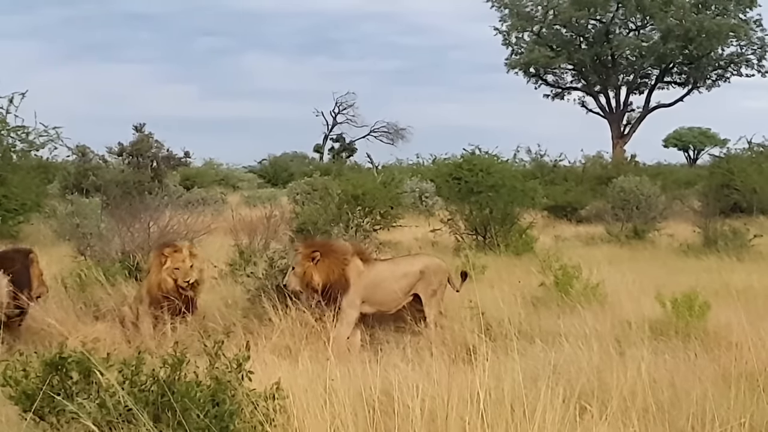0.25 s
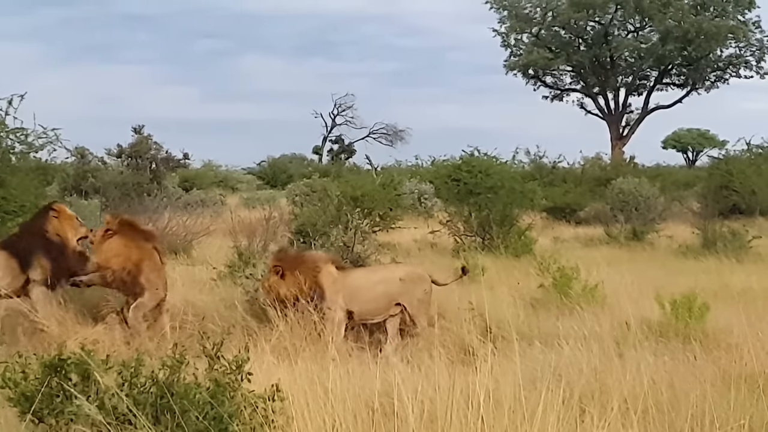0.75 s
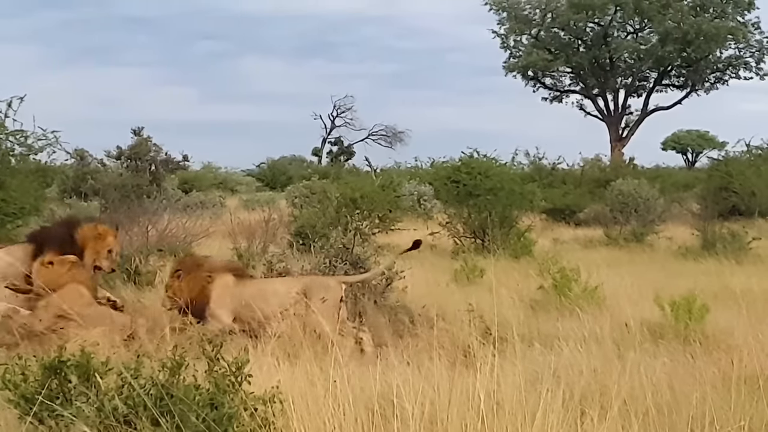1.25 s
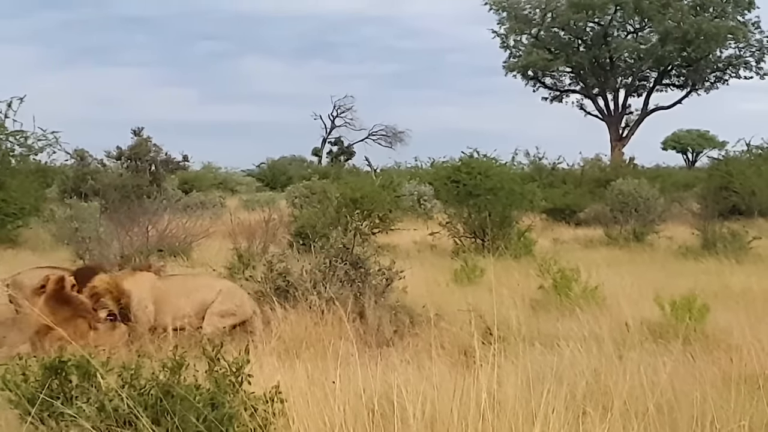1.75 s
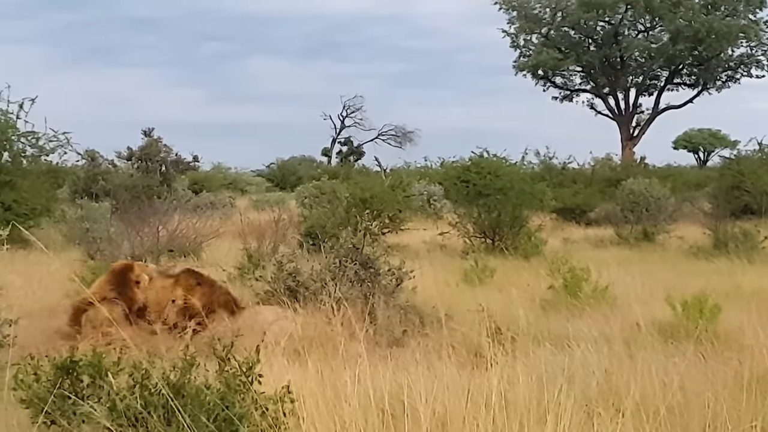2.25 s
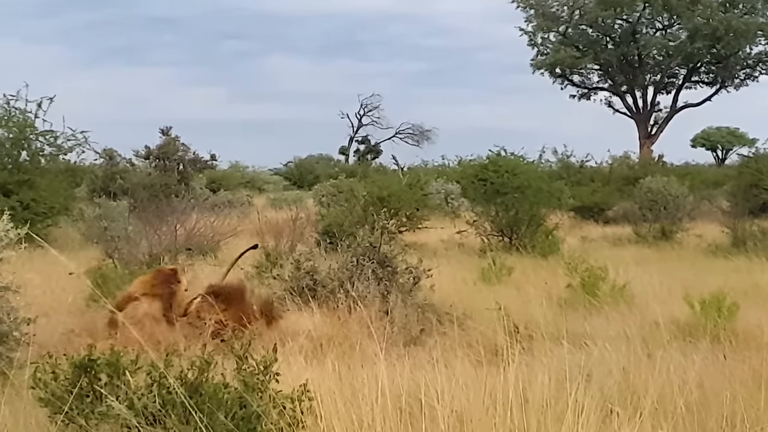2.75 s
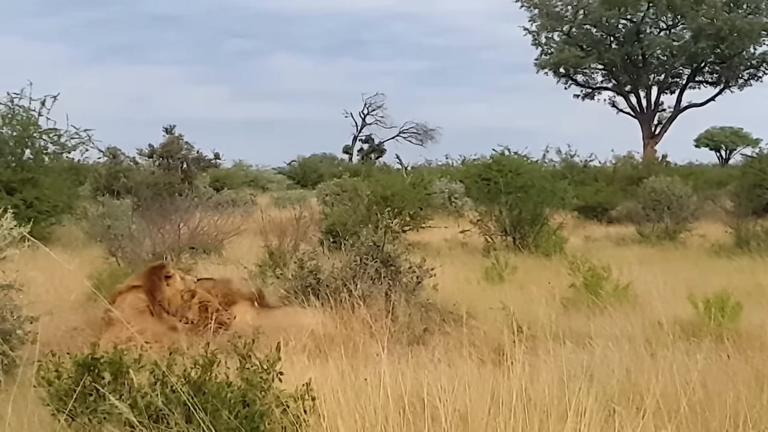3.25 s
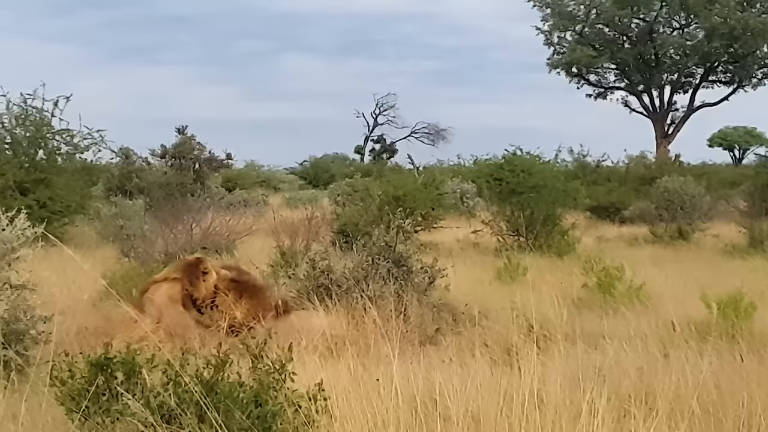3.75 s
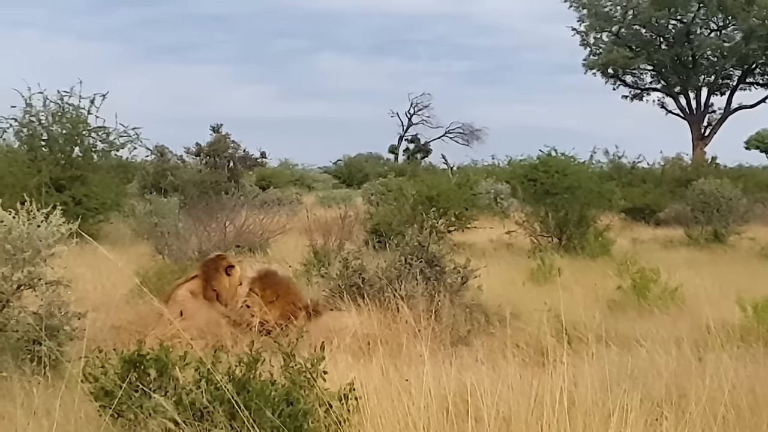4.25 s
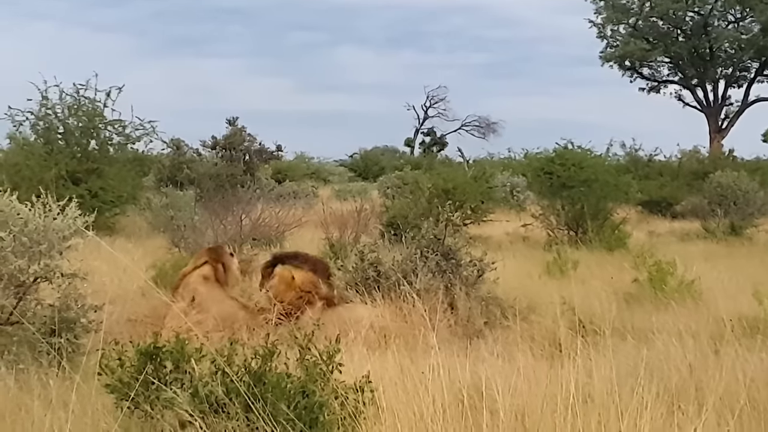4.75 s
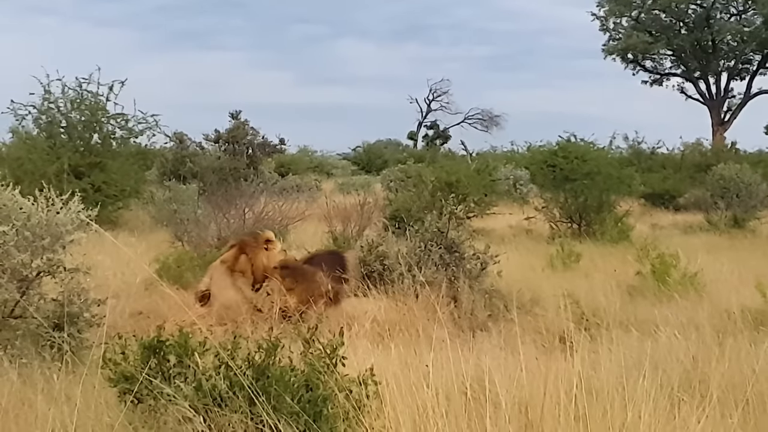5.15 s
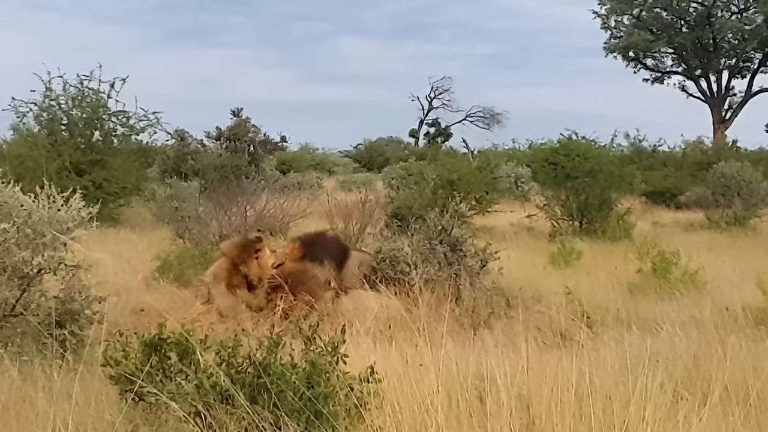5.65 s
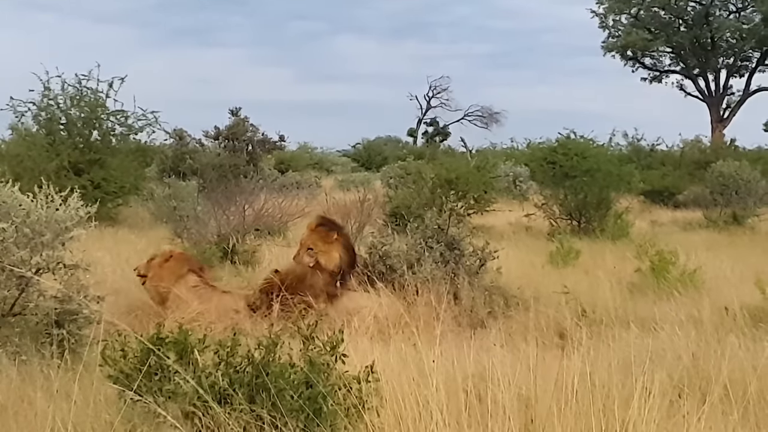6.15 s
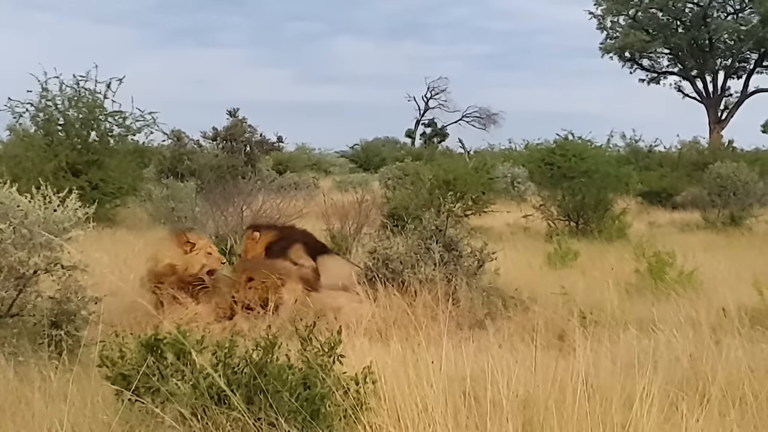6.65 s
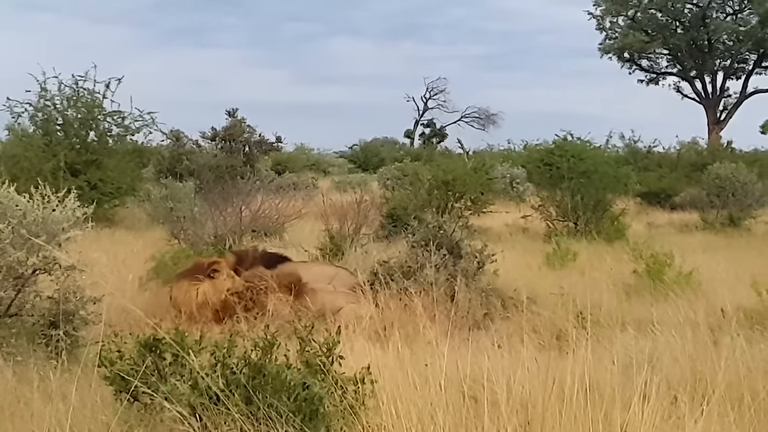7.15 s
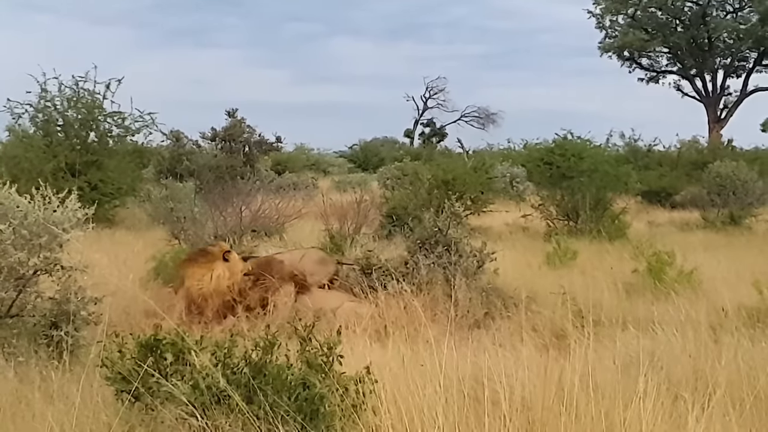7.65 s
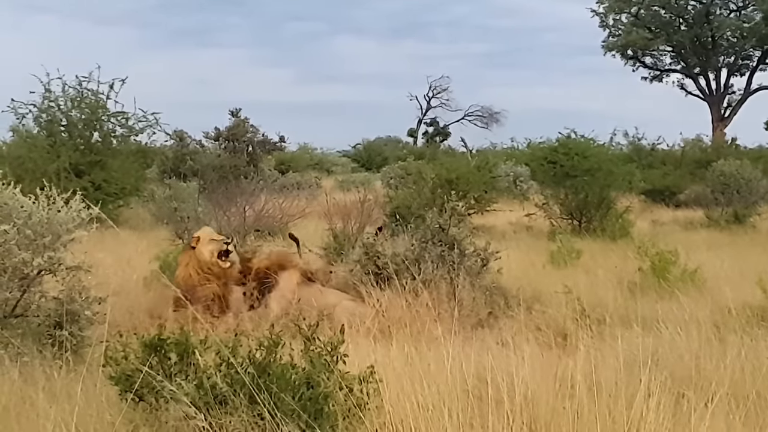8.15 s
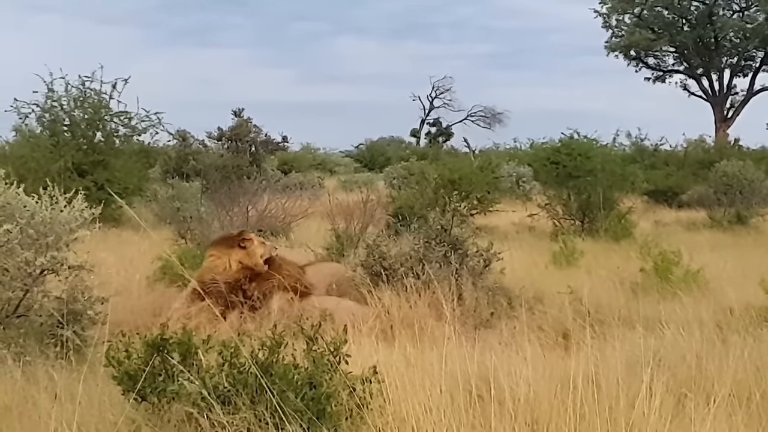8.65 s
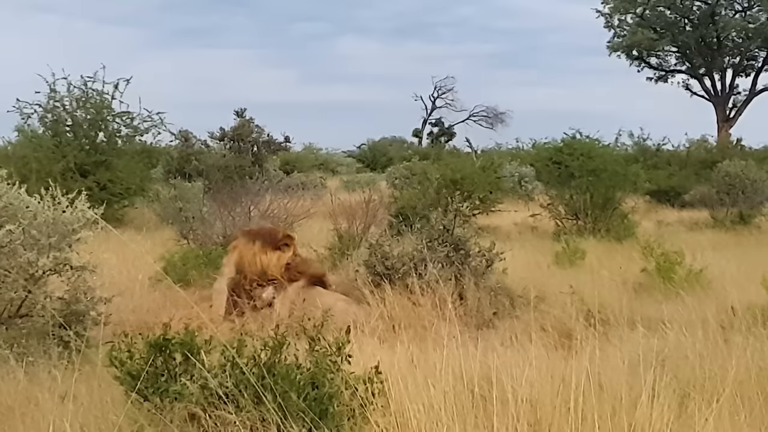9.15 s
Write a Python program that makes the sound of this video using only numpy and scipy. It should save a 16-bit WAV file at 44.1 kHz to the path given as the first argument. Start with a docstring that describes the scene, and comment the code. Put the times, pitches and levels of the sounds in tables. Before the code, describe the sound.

Male lions fight in dry savanna grass, rough throaty growls and roars following one another almost without pause, with rustling grass and light wind rumble.

```python
"""Male lions fight in dry savanna grass: two faint growls, then loud ones with a rival and snarls over the teeth.
From 1.4 s growl follows growl, with sweeping wails and booming moans; about 6.1-6.7 s the voices sink, then swell.
Slack folds slap 24-50 times a second into a long throat of gliding resonances; a rival's faster folds join in.
Throughout, noise grains crackle as thrashed grass, a few stalks crack, and shaped noise rumbles as light wind."""
import sys
import numpy as np
from scipy import signal
from scipy.fft import rfft, irfft, next_fast_len
from scipy.io import wavfile
from scipy.ndimage import uniform_filter1d, map_coordinates

SR = 44100
rng = np.random.default_rng(int(sys.argv[2]) if len(sys.argv) > 2 else 0)


def pcm_store(signal):
    """Save signal as 16-bit PCM."""
    levels = np.round(np.clip(np.atleast_2d(signal), -1, 1) * 32767)
    wavfile.write(sys.argv[1], SR, levels.astype(np.int16).T)


N = 414540
TIME = np.arange(N) / SR
SIZE = 3072  # samples in one slap

# one growl a row: start_s, length_s, slap rate at its start_hz, middle_hz, end_hz
GROWL_TIMING = [(0.015, 0.135, 28.6, 25.7, 24.7), (0.165, 0.165, 23.5, 27.4, 28.8),
                (0.388, 0.332, 29.0, 38.0, 46.2), (0.726, 0.204, 48.8, 46.1, 48.0),
                (0.942, 0.208, 48.2, 50.1, 48.2), (1.159, 0.221, 46.0, 42.6, 41.8),
                (1.389, 0.251, 40.8, 43.5, 36.0), (1.663, 0.357, 43.9, 39.6, 38.5),
                (2.044, 0.456, 39.2, 33.6, 30.6), (2.512, 0.378, 34.2, 31.2, 29.7),
                (3.062, 0.538, 33.2, 35.8, 28.6), (3.629, 0.451, 32.5, 33.8, 29.1),
                (4.099, 0.211, 25.4, 33.1, 26.5), (4.331, 0.48, 37.0, 36.7, 35.9),
                (4.827, 0.243, 36.7, 39.7, 32.8), (5.098, 0.352, 38.7, 44.6, 46.8),
                (5.472, 0.268, 41.6, 44.4, 37.7), (5.785, 0.345, 42.4, 42.2, 29.0),
                (6.139, 0.191, 29.9, 29.4, 28.1), (6.372, 0.128, 29.5, 30.5, 31.5),
                (6.507, 0.162, 31.5, 33.0, 32.0), (6.679, 0.361, 34.8, 36.3, 42.8),
                (7.053, 0.13, 37.0, 36.5, 35.0), (7.192, 0.45, 32.5, 38.8, 34.0),
                (7.663, 0.225, 34.5, 33.5, 32.5), (7.903, 0.46, 31.3, 29.8, 26.5),
                (8.386, 0.065, 42.0, 45.0, 45.0), (8.467, 0.2, 31.5, 32.0, 34.0),
                (8.68, 0.299, 39.0, 44.7, 36.5), (8.995, 0.155, 40.7, 30.4, 31.3),
                (9.174, 0.246, 36.4, 37.1, 36.5)]
# left-right likeness of turbulence and echo: frequency_hz, likeness (-1 to 1)
LION_LIKENESS = [(60, 0.87), (700, 1), (1200, 1), (2200, 1), (4000, 0.67), (15000, 0)]


def growl():
    """The leading lion: slow, nearly even fold slaps whose rate glides within each growl."""
    trains = []
    for start, length, first, middle, last in GROWL_TIMING:
        knots_s = [start, start + length / 2, start + length]
        trains.append(beats(np.interp(TIME, knots_s, [first, middle, last], left=0, right=0)))
    times, rate = np.hstack(trains)
    pose = posture(times)
    jitter_s = .002 * pose["rough"] * rng.standard_normal(len(times)).clip(-2, 2)
    times = times + jitter_s
    gain = barks(times) * np.sqrt((1 - pose["share"]) * SR / rate)
    closing_s = .0008  # the folds take this long to snap shut
    return amp(-0.05) * slaps(times + closing_s, gain, 0.66 * pose["rough"], puff_s=0.0036, scatter_db=0.87)


def rival():
    """A second lion: faster, unsteady folds, heard by its share of each growl and of the grumble between."""
    times, rate = beats(98 * np.exp(.04 * wobble(60) + .13 * wobble(5)))
    pose = posture(times)
    gain = barks(times) * np.sqrt(pose["share"] * SR / rate)
    return slaps(times, gain, pose["rough"] ** 1.08, puff_s=0.0033, scatter_db=2.5)


def slaps(times, gain, rough, puff_s, scatter_db):
    """Each closing of the folds is a clean slap plus a puff of turbulence, both through the tract."""
    hz, t = np.fft.rfftfreq(SIZE, 1 / SR), np.arange(SIZE) / SR
    draws = rng.standard_normal((len(times), 2 * SIZE + 1))
    fade = np.exp(-t / puff_s)
    fade /= np.linalg.norm(fade)
    noise = draws[:, 1:].reshape(-1, 2, SIZE).swapaxes(0, 1)
    puff = spread(rfft(noise * fade), hz, LION_LIKENESS)
    # turbulence grows with frequency, from lower down in a rough voice
    breathy_hz = 2700 * np.exp(-2 * rough[:, None])
    noisy = np.clip(rough[:, None] + 3.76 * hz ** 3 / (hz ** 3 + breathy_hz ** 3), 0, .98)
    sound = irfft(tract(times, hz) * (np.sqrt(1 - noisy) + np.sqrt(noisy) * puff))
    lead = SIZE // 32
    window = signal.windows.tukey(SIZE, 2 * lead / SIZE)  # smooth start and end
    sound = np.roll(sound, lead, axis=-1) * window
    sound *= (gain * amp(scatter_db * draws[:, 0]))[:, None]
    at = (np.round(times * SR).astype(int)[:, None] + np.arange(SIZE)).ravel()
    return np.array([np.bincount(at, side.ravel(), N + lead)[lead:lead + N] for side in sound])


def tract(times, hz):
    """The causal response of chest, throat, mouth and teeth at each slap, from summed resonance powers."""
    # deep chest booms: peak_s, half_length_s, level_db, resonance_hz, glide_hz_per_s
    moans = [(.385, 0.038, -26, 112, 0), (.614, .07, -22, 160, -84), (1.8, 0.11, -21.5, 165, -64),
             (2.34, 0.035, -14.5, 171.6, -3), (2.57, 0.11, -22.5, 176.6, -1),
             (2.952, 0.25, -32.5, 152.7, 4), (4.36, 0.082, -26, 136, -150), (4.66, 0.037, -29, 183, -1),
             (4.94, 0.041, -15.5, 168, -60), (5.87, 0.08, -10.5, 169.5, 158), (7.13, 0.13, -19, 191, -100),
             (7.3, 0.046, -15.5, 172, 1), (7.83, 0.029, -18, 153.5, 4), (8.66, 0.078, -22.5, 176, 4),
             (9.3, 0.11, -25.5, 160, 0)]
    # one resonance stands out and may sweep: peak_s, half_length_s, level_db, resonance_hz, glide_hz_per_s
    wails = [(.22, 0.025, -38, 1243, 1000), (.41, 0.036, -37.5, 1195, -6), (.85, 0.025, -26, 1370, -1200),
             (.97, 0.06, -23, 741, 0), (1.33, 0.023, -23, 1270, 2000), (3.17, .025, -38, 1240, 2),
             (3.45, 0.12, -42.5, 1555, 0), (3.74, .045, -34, 1303, -500), (4.58, 0.088, -22.5, 353, -330),
             (4.93, 0.059, -16.5, 382, -300), (5.23, 0.04, -34, 1064, 2497), (5.5, 0.036, -22.5, 326, -400),
             (6.97, .04, -20.5, 652, 900), (7.48, 0.032, -28, 1164, -250), (8.68, 0.039, -32.5, 837, -3500),
             (8.78, 0.049, -16.5, 456, -2500)]
    # bared teeth: peak_s, half_length_s, level_db, resonance_hz
    snarls = [(0.549, 0.047, -38.5, 3200), (.75, 0.12, -43, 3050), (1.519, 0.27, -55, 2670),
              (2.33, 0.011, -42, 2700), (2.39, 0.011, -41.5, 2280), (2.42, 0.039, -46.5, 3030),
              (2.575, 0.079, -50, 2800), (1.9, 0.066, -51.5, 2730), (2.194, 0.058, -53, 2120),
              (3.269, 0.062, -48.5, 2480), (3.58, 0.042, -60, 3680), (3.83, 0.018, -48, 3650),
              (3.92, 0.064, -57.5, 2390), (4.211, 0.027, -64, 3520), (4.02, 0.035, -62, 2300),
              (4.44, 0.11, -63.5, 3050), (4.7, 0.055, -53.5, 3070), (5.18, 0.043, -54, 2790),
              (5.32, 0.055, -53, 3180), (5.86, 0.042, -45, 1890), (5.99, 0.052, -44.5, 3440),
              (6.508, 0.031, -53.5, 2890), (6.87, 0.1, -48.5, 2720), (7.28, 0.023, -44, 2740),
              (7.37, 0.053, -45.5, 1700), (7.47, 0.037, -52, 2410), (8.519, 0.05, -39, 3180),
              (8.6, 0.024, -44.5, 3190), (8.7, 0.071, -50, 3030), (8.88, 0.014, -53, 3720),
              (9.1, 0.034, -58.5, 3030), (9.36, 0.09, -50.5, 2950)]
    # weaker overtones: centre_hz (before twist), width_hz, level_db re snarl
    overtones = [(1640, 68, 0), (2240, 57, -4), (3700, 190, -11), (4870, 340, -12.5), (6740, 630, -12),
                 (9700, 2000, -19)]
    silent_db, hiss_db = -100, -22.5  # hiss re mouth: every growl hisses a little
    teeth_db, teeth_tremble = 2.5, 0.048  # re snarl; shake from slap to slap, share of pitch
    jaw_tremble = 0.1  # share of pitch at full rival's share
    double_width_db = -44  # snarl level at which the teeth resonance is twice as wide

    pose = {name: value[:, None] for name, value in posture(times).items()}
    moan, moan_hz = standing_out(moans, times, silent_db)
    wail, wail_hz = standing_out(wails, times, silent_db)
    snarl, teeth_hz = standing_out(snarls, times, pose["mouth"][:, 0] + hiss_db)
    shake = rng.standard_normal((len(times), 2))
    tremble = np.exp(jaw_tremble * pose["share"] * shake[:, :1])
    twist = drift(times) * np.exp(teeth_tremble * shake[:, 1:])
    damping = pose["damping"]
    teeth_width_hz = 102 * (1 + amp(snarl - double_width_db))

    # centre_hz, width_hz, level_db
    power = (resonance(hz, pose["chest_hz"], 34.6 * damping, pose["chest"])
             + resonance(hz, pose["throat_hz"], 43 * damping, pose["effort"])
             + resonance(hz, pose["pharynx_hz"], 62 * damping, pose["pharynx"])
             + resonance(hz, pose["jaw_hz"] * tremble, 48 * damping, pose["jaw"])
             + resonance(hz, pose["mouth_hz"] * tremble, 71 * damping, pose["mouth"])
             + resonance(hz, 900 + 0.45 * pose["mouth_hz"], 142, pose["lips"])
             + resonance(hz, moan_hz, 20, moan)
             + resonance(hz, wail_hz, 41.5, wail)
             + resonance(hz, teeth_hz * twist, teeth_width_hz, snarl + teeth_db)
             + resonance(hz, 1000, 150, pose["mouth"] - 12.5))  # broad crack of each slap in the open mouth
    for centre, width, db in overtones:
        power = power + resonance(hz, centre * twist, width, snarl + db)

    # minimum phase by folding the cepstrum
    cepstrum = irfft(np.log(power + 1e-12) / 2)
    cepstrum[:, 1:SIZE // 2] *= 2
    cepstrum[:, SIZE // 2 + 1:] = 0
    reflected = hz ** 2 / (hz ** 2 + 700 ** 2)  # long waves bend round the bodies
    response = np.exp(rfft(cepstrum) + reflected * rfft(ripple(times, depth_db=3.8)))
    # the reflections colour a slap but leave its energy alone
    return response * np.sqrt(power.sum(axis=1) / (np.abs(response) ** 2).sum(axis=1))[:, None]


def posture(times):
    """Effort and throat shape: a growl swells and fades as resonances glide and the mouth opens or closes."""
    # one growl a row: peak level_db, peak place (0-1), swell_db, fade_db,
    # chest_db re throat, chest_hz, throat_hz, throat and pharynx glide_hz, pharynx_db re throat, pharynx_hz,
    # jaw_db re throat, jaw_hz, jaw glide_hz, mouth_db re throat, mouth_hz, mouth glide_hz, lips_db re mouth,
    # opening_db of jaw and mouth over the growl, width factor, roughness (0-1), rival's share (0-1)
    voices = [(-44.5, 0.77, 18, 23, -15, 200, 300, 35.0, 1.5, 380, -10.5, 800, 20.0, 2, 1160, 54.5, 8, -22, 0.62, 0.5, 0.03),
              (-48.5, 0.47, 5.5, 27, -18, 140, 190, 121, 10, 430, 2, 540, 15, 4.5, 1220, 60.0, -23.5, -12.5, 0.31, 0.96, 0.18),
              (-19.5, 0.69, 30, -1, -1.5, 172.0, 260, 27, 3.5, 364, -6, 690, 85, -2.5, 1080, -70.0, -0.5, -9.5, 1.4, 0.25, 0.73),
              (-18.5, 0, -3, -1.5, -30, 160, 280, 27.5, 0, 417, -1, 719, 24.5, -11.0, 1080, -160.0, -2, -1, 1, 0.1, 0.55),
              (-22.5, 1, -1.5, -0.5, -18, 130, 252, -14, 3, 372, -1.5, 729, -36, -11, 1100, -87, -20, 4, 1.03, 0.16, 0.75),
              (-23, 1, 0.5, 2.5, -2, 193.0, 249, 33, -10, 403, 0, 683, -8, -4, 1050, 61, -13.5, -5.5, 0.79, 0.12, 0.48),
              (-22.5, 0, 6.5, -7, -9.5, 150, 320, -120.0, -14.5, 590, -10.0, 720, -0.0, -17.5, 1250, -240.0, 0.5, -13.5, 1.76, 0.3, 0.22),
              (-17.5, 0.31, 5, 19, -1.5, 145, 188, -100.0, 0, 384, -12.5, 680, -75.0, -20, 1110, -70.0, 1.5, -2, 1.87, 0.2, 0.5),
              (-24, 0.6, 14, -1.5, 0, 133.0, 214, 134, -2, 392, -5.5, 640, -51, -14.5, 1160, 10.0, -11, -9.5, 1.7, 0.33, 0.65),
              (-28.5, 0.07, -1.5, 21.5, 7, 193, 332, 32, 6, 452.0, 1, 698, 36, -11, 1096, 72, -5, 1.5, 1.28, 0.4, 0.13),
              (-16, 0.36, 14.5, 9.5, -14, 177, 279, 17, -4, 439, -16.5, 695, 61, -20.5, 1136, -110.0, -0.5, 2.5, 1.08, 0.1, 0.07),
              (-19.5, 0.41, 5.5, 14, -6, 186.0, 274, 13, -3, 460, -19.5, 739.0, 240, -18, 1115, -280.0, -8.5, -7, 0.95, 0.2, 0.09),
              (-21, 0.6, 6.5, 16.5, -8.5, 162.0, 286.0, 1.5, -5.5, 443, -19, 704, 83, -16.5, 1140, 180.0, -4, 1, 1.07, 0.3, 0.04),
              (-25, 0.8, 11.5, 2, -0.5, 187.0, 341, -54, -10.5, 450, -13, 694, 14, -21, 1155.0, 16, -4.5, -3, 1.06, 0.15, 0.11),
              (-22.5, 0.7, 9, 1, 4.5, 151, 275.0, -78, 4, 380, -8.5, 696, -53, -19.5, 1175.0, 204, -4.5, 2, 1.24, 0.14, 0.17),
              (-20, 0.68, 3, 10, -4, 206, 278, 3, 2, 378, -5.5, 649, 46.5, -13, 1228, -10, -10.5, -7, 1.14, 0.12, 0.17),
              (-19.5, 0.35, 5, 8, -31, 150, 275.0, 14, -9, 345.0, -12, 638, 32, -19, 1146, 58, -9.5, 5, 1.25, 0.3, 0.17),
              (-24.5, 0.44, -0.5, 17.5, -7, 350, 297.0, -77, -2, 440, -4, 658, -260.0, -15, 1060, 85, 3.5, 12.5, 1.08, 0.08, 0.14),
              (-56, 0.03, -4, 26, -11, 168.0, 227, 24, -9.0, 445.0, 4, 490, 10.0, 8, 1260, -70.0, -26, -17.5, 1.5, 1, 0.5),
              (-41, 0, 6, 17.5, 17.5, 126.0, 230, 20.0, -10, 490, 6.5, 834, 207, -4, 1120, 200.0, 1, 3, 1.5, 0.1, 0.12),
              (-35.5, 0.95, 10.5, -18, 7.5, 180, 197, 122, -6.5, 470, -7, 770, -105.0, -8, 1230, -200.0, -29, -23, 1.8, 0.6, 0.23),
              (-16, 0.23, 13, 2.5, -5.5, 168.0, 280, 1, -6.5, 500, -15, 703, -160.0, -15.5, 1135, -120.0, -3, 0.5, 0.89, 0.13, 0.07),
              (-28, 0, -1.5, -0.5, 12, 183, 383, -28, -14, 540, -12.5, 750, 92, -16, 980, 10.0, -2, -4, 1.8, 0.05, 0.25),
              (-22.5, 0.51, 7, 21, -3.5, 260, 235, 130, 0.5, 425, -6, 720, -37, -10, 1220, -44.5, -24, 7, 3.16, 0.2, 0.1),
              (-31.5, 0.95, 9, 17, 12, 132, 346, 35, -9, 535, -9.5, 760, 60, -14.5, 1200, -60, -21, -14, 1.62, 0.3, 0.1),
              (-32, 0.16, 4, 14.5, 9, 164, 301, -86, -8, 290, -16, 870, 36, -24, 1000, 177, -5.5, -3, 1.5, 0.07, 0.08),
              (-30, 0.9, 12, -5, -1.5, 200, 300, -20.0, -8.5, 600, -11, 530, -11, -8, 1330, -60.0, -17, 5, 1.2, 0.2, 0.94),
              (-25, 0.06, -2.5, -4.5, 4, 191, 306, 107, -2, 546.0, -7, 722, 68.5, -3, 1210, 67, -9, -7.5, 1.62, 0.3, 0.03),
              (-18.5, 0.8, -0.5, 8, -4.5, 209, 367, 103, -1.5, 180, -12, 618, 11, -16, 1110, -180.0, -3.5, -5.5, 2.5, 0.1, 0.13),
              (-21.5, 0.54, 3, 2, 3.5, 200.0, 300, 32, -3, 464, -11, 680, 8, -17.5, 1065.0, -40, -0.5, -1, 1.08, 0.12, 0.05),
              (-21.5, 0.3, 4.5, 1, 5.5, 156.0, 362, -16, -6.5, 547, -2, 718, 86, -13, 1080, 30.0, -9, 2.5, 0.97, 0.08, 0.28)]
    # breathy stretches where the voices run together: peak_s, half_length_s,
    # lost_db (share of the clean voice lost)
    rasps = [(2.33, .08, -7.5), (8.66, 0.024, -7.5)]
    release_db_per_s = 132.5
    # between growls the rival takes over with a faint grumble
    grumble_db, handover_s = -49, 0.064

    rows = np.hstack([GROWL_TIMING, voices])
    now = np.maximum(np.searchsorted(rows[:, 0], times + .006) - 1, 0)
    (start, length, _, _, _, level, peak, swell, fade, chest, chest_hz,
     throat_hz, throat_glide, pharynx, pharynx_hz, jaw, jaw_hz, jaw_glide,
     mouth, mouth_hz, mouth_glide, lips, opening, damping, rough, share) = rows[now].T
    u, peak = np.clip((times - start) / length, 0, 1), np.clip(peak, .05, .95)
    since_end_s = np.maximum(times - start - length, 0)
    way = u - .5  # place in the growl, from its middle
    rise_db = swell * (1 - u / peak) ** 2
    fall_db = fade * ((u - peak) / (1 - peak)) ** 2
    effort = level - np.where(u < peak, rise_db, fall_db) - release_db_per_s * since_end_s
    opened = effort + opening * way
    clean = np.clip(1 - swells(rasps, times).sum(axis=0), 0, 1)
    lead_share = (1 - np.clip(share, 0, 1)) * np.exp(-since_end_s / handover_s)
    return dict(effort=np.maximum(effort, grumble_db),
                chest=effort + chest, chest_hz=chest_hz,
                throat_hz=throat_hz + throat_glide * way,
                pharynx=effort + pharynx, pharynx_hz=pharynx_hz + throat_glide * way,
                jaw=opened + jaw, jaw_hz=jaw_hz + jaw_glide * way,
                mouth=opened + mouth, mouth_hz=mouth_hz + mouth_glide * way,
                lips=opened + mouth + lips,
                damping=np.maximum(damping, .5),
                rough=1 - clean * (1 - np.clip(rough, 0, 1)),
                share=1 - clean * lead_share)


def barks(times):
    """Gain of the brief heaves and catches of breath pressure."""
    # peak_s, extra_db
    heaves = [(.419, 6.5), (.45, -3), (0.482, 5), (2.655, -6), (2.718, 7), (4.18, 4), (4.829, 5),
              (5.787, -0.5), (6.475, 6.5), (7.536, 8), (7.678, 5.5), (8.499, 2.5), (8.564, -5),
              (8.593, 3.5), (9.065, 3.5)]
    return amp(sum(db * np.exp(-((times - s) / 0.022) ** 2) for s, db in heaves))


def standing_out(events, times, floor_db):
    """Level and centre of a resonance that swells at each event and may glide: the strongest events rule it."""
    gains = swells(events, times)
    centres = np.array([hz + sum(glide) * np.clip(times - s, -2 * half, 2 * half)
                        for s, half, _, hz, *glide in events])
    weights = gains + 1e-9
    level_db = 20 * np.log10(together(gains, floor_db))
    centre_hz = (centres * weights).sum(axis=0) / weights.sum(axis=0)
    return level_db[:, None], centre_hz[:, None]


def resonance(hz, centre_hz, width_hz, db):
    """Power spectrum of one steep-sided resonance whose mean power is db."""
    detune = (hz ** 2 - centre_hz ** 2) / (2 * np.maximum(hz, 1) * width_hz)
    peak = 1 / (1 + detune ** 2) ** 2 / (1 + (hz / (centre_hz * 1.28)) ** 6)
    return amp(db) ** 2 * peak / peak.mean(axis=-1, keepdims=True)


def drift(times):
    """The upper resonances wander as the heads twist: a slow random factor on their pitch."""
    share, moves_per_s = 0.03, 11
    knots = rng.standard_normal(int(N * moves_per_s / SR) + 4)
    return np.exp(share * map_coordinates(knots, [times * moves_per_s], mode="nearest"))[:, None]


def ripple(times, depth_db):
    """Cepstrum of the reflections off ground and bodies, 2-14 ms late, which drift as the lions move."""
    lag_s = np.arange(SIZE) / SR
    window = (lag_s > .002) * (lag_s < .014) * np.exp(-lag_s / .012)
    step_s = .16
    knots_s = np.arange(0, N / SR + step_s, step_s)
    blend = np.exp(-((times[:, None] - knots_s) / step_s) ** 2)
    blend /= np.linalg.norm(blend, axis=1, keepdims=True)
    field = blend @ rng.standard_normal((len(knots_s), SIZE)) * window / np.linalg.norm(window)
    depth = np.log(amp(depth_db))
    field *= depth * np.sqrt(2)
    field[:, 0] = -depth ** 2  # offsets the mean power the ripple adds
    return field


def bushes(x, t60):
    """The surrounding thorn bushes scatter back a short tail of decaying noise."""
    t = np.arange(SR // 2) / SR
    tail = rng.standard_normal((2, len(t))) * amp(-60 * t / t60) * (1 - np.exp(-t / 0.0063))
    tail = irfft(spread(rfft(tail), np.fft.rfftfreq(len(t), 1 / SR), LION_LIKENESS))
    return signal.fftconvolve(x, tail / np.linalg.norm(tail[0]), axes=1)[:, :N]


def grass():
    """Dry blades crackle in dense grains as bodies roll; coarse stems and fine tips swell apart."""
    # bodies rolling: peak_s, half_length_s, level_db (before the stem and tip gains)
    thrashes = [(0.682, 0.12, -42.5), (0.962, 0.057, -46), (1.249, 0.05, -47.5), (1.551, 0.17, -45),
                (2.331, 0.12, -51.5), (2.722, 0.23, -57), (2.938, 0.022, -53.5), (3.31, 0.066, -55.5),
                (3.78, 0.038, -61), (4.816, 0.035, -61.5), (5.17, 0.11, -59.5), (5.567, 0.17, -55.5),
                (5.986, 0.072, -56.5), (6.764, 0.059, -49), (6.976, 0.081, -47.5), (7.332, 0.088, -53),
                (7.808, 0.16, -58.5), (8.27, 0.051, -52.5), (8.534, 0.25, -55), (8.73, 0.07, -46.5),
                (9.368, .06, -63)]
    # frequency_hz, level_db per Hz (relative)
    grass_spectrum = [(1200, 1.5), (2000, -10), (3000, 4), (4200, 1.5), (5500, 2), (7500, 2), (9500, 5.5),
                      (11000, 6.5), (12500, 0.5), (15500, -5.5)]
    rustle_floor_db = -70  # never quite still; before the stem and tip gains
    gains = np.array([amp(db) / np.cosh((TIME - s) / half).clip(max=1e9) for s, half, db in thrashes])
    level = together(gains, rustle_floor_db)
    hits = rng.random(N) < 700 / SR  # 700 grains a second on average
    grains = rng.standard_normal((2, N)) * hits * amp(4.6 * rng.exponential(size=N).clip(0, 4))
    source = rng.standard_normal((2, N)) + 0.39 * unit(grains)
    rustle = patchy(coloured(source, grass_spectrum), depth_db=4.0)
    stems = filtered(rustle, lambda hz: 1 / (1 + (hz / 7000) ** 4))
    tips = rustle - stems
    return level * (stems * amp(5.0 + 2.5 * wobble(34)) + tips * amp(4.5 + 0.51 * wobble(36)))


def stalks():
    """A breaking stalk gives one short bright crack of decaying noise."""
    # start_s, level_db (before the common trim and the filter)
    snaps = [(0.4613, -31), (1.491, -30), (3.728, -39.5), (5.7695, -35), (8.5943, -34)]
    out, t = np.zeros((2, N + SIZE)), np.arange(SIZE) / SR
    for s, db in snaps:
        crack = amp(db - 13.0 - 60 * t / 0.082) * rng.standard_normal((2, SIZE))
        out[:, round(s * SR):][:, :SIZE] += crack
    bright = [(500, -16), (2500, 5), (10000, 11.5), (15500, -1.0)]  # hz, db
    return filtered(out, lambda hz: amp(along(bright, hz)))[:, :N]


def wind():
    """Gusts rumble on the microphone ports over the steady air of the plain."""
    # peak_s, half_length_s, level_db (before the buffet gain)
    gusts = [(.03, 0.049, -26), (.8, 0.68, -30.5), (1.85, 0.57, -28), (2.35, 0.42, -28.5),
             (2.8, 0.039, -19.5), (3.28, 0.14, -24.5), (4.8, 0.89, -31), (6.0, 0.017, -15),
             (7.04, 0.052, -27), (7.34, 0.082, -27), (6.45, 0.39, -33.5), (8.95, .3, -39.5)]
    # frequency_hz, level_db per Hz (relative)
    rumble_spectrum = [(12, -28), (25, -9.5), (40, -6), (62, 0.5), (85, 3.5), (120, -2.5), (200, -15.5),
                       (400, -52), (1000, -71)]
    # frequency_hz, level_db per Hz (relative)
    air_spectrum = [(60, 18), (200, 1), (500, -3.5), (1200, 1.5), (2000, -5.5), (3200, -7.5), (5000, -102),
                    (10000, -70), (15500, -49)]
    breeze_db = -34.5  # between the gusts, before the buffet gain
    level = together(swells(gusts, TIME), breeze_db) * amp(3.0 + 0.17 * wobble(16))
    buffet = level * coloured(rng.standard_normal((2, N)), rumble_spectrum)
    return buffet + amp(-48.5) * coloured(rng.standard_normal((2, N)), air_spectrum)


def amp(db):
    """Decibels to gain."""
    return 10 ** (np.asarray(db) / 20)


def unit(x):
    """Scale to rms 1."""
    return x / np.sqrt(np.mean(x ** 2) + 1e-20)


def along(points, hz):
    """Interpolate (Hz, value) points on a log frequency axis."""
    f, v = np.transpose(points)
    return np.interp(np.log(hz + 1), np.log(f + 1), v)


def wobble(rate):
    """A smooth random curve, rate knots a second."""
    return map_coordinates(rng.standard_normal(int(N * rate / SR) + 4), [TIME * rate])


def filtered(x, response):
    """x times a response of frequency."""
    m = next_fast_len(N + SR // 4)
    return irfft(rfft(x, m) * response(np.fft.rfftfreq(m, 1 / SR)), m)[..., :N]


def spread(pair, hz, likeness):
    """Two unrelated spectra become left and right with the given likeness."""
    turn = np.arccos(np.clip(along(likeness, hz), -1, 1)) / 2
    mid, side = pair[0] * np.cos(turn), pair[1] * np.sin(turn)
    return np.array([mid + side, mid - side])


def coloured(pair, spectrum):
    """Two noises turned into stereo sound of rms 1 with the given spectrum."""
    # left-right likeness of the background: frequency_hz, likeness (-1 to 1)
    background_likeness = [(30, -0.18), (60, 0.76), (130, 0.66), (300, 0.3), (700, 0.83), (1200, 0.1),
                           (1800, 0.25), (3000, 0.033), (15000, -0.062)]
    m = next_fast_len(N + SR // 4)
    hz = np.fft.rfftfreq(m, 1 / SR)
    stereo = spread(rfft(pair, m), hz, background_likeness)
    return unit(irfft(stereo * amp(along(spectrum, hz)), m)[:, :N])


def patchy(x, depth_db):
    """Give a sound short-lived patches of random colour."""
    z = signal.stft(x, nperseg=512)[2]
    field = uniform_filter1d(rng.standard_normal(z.shape[1:]), size=4, axis=0)
    field = uniform_filter1d(field, size=6, axis=1)
    return unit(signal.istft(z * amp(depth_db * unit(field)), nperseg=512)[1][:, :N])


def beats(rate):
    """Times at which a per-sample rate starts each cycle, and the rate then."""
    cycles = np.cumsum(rate) / SR
    at = np.flatnonzero(np.diff(np.ceil(cycles), prepend=0) > 0)
    return TIME[at], rate[at]


def swells(events, times):
    """Amplitude of each bell-shaped event (s, half length s, dB, ..) at the given times, one row per event."""
    return np.array([amp(db) * np.exp(-.5 * ((times - s) / half) ** 2) for s, half, db, *_ in events])


def together(gains, floor_db):
    """Amplitude of unrelated sounds heard together over a floor."""
    return np.sqrt(np.sum(gains ** 2, axis=0) + amp(floor_db) ** 2)


def scene():
    """Both lions, off to one side of the ports, with their echo, the grass and the wind."""
    # phase lead of the left port: frequency_hz, lead_rad
    left_lead = [(30, 0.3), (300, 0.1), (700, 0.31), (1200, 0.95), (1600, 1.8), (4000, 1.34)]
    lions = growl() + rival()
    lions = lions + amp(-10.5) * bushes(lions, t60=0.07)
    lions = filtered(lions, lambda hz: np.exp(.5j * along(left_lead, hz) * np.array([[1], [-1]])))
    return lions * amp([[-.3], [.3]]) + (grass() + stalks()) * amp([[-1], [1]]) + wind()


def record(dry):
    """The camera rounds off the highest peaks and keeps nothing above its band limit."""
    top_hz = 15650
    rounded = dry / (1 + np.abs(dry) ** 6) ** (1 / 6)
    return filtered(rounded, lambda hz: hz < top_hz)


dry = scene()
out = record(dry)
pcm_store(out)
```